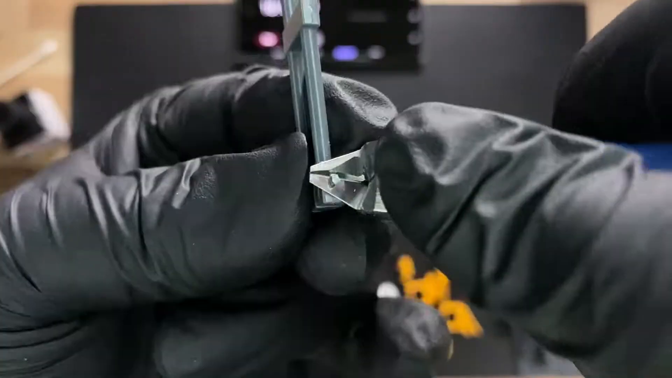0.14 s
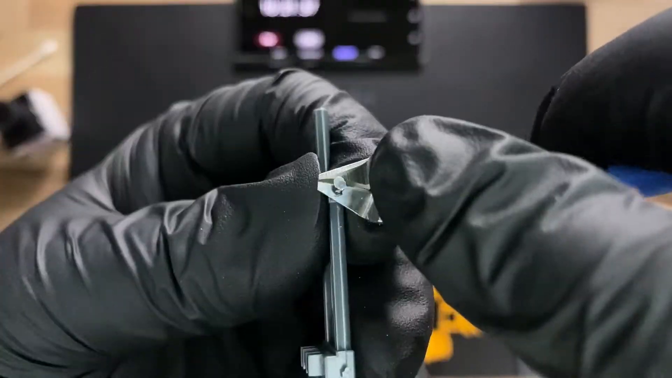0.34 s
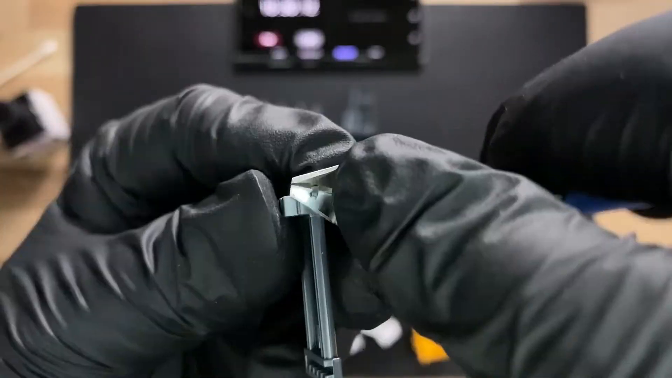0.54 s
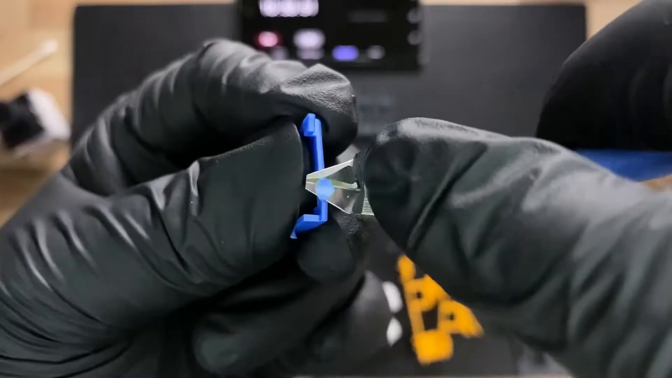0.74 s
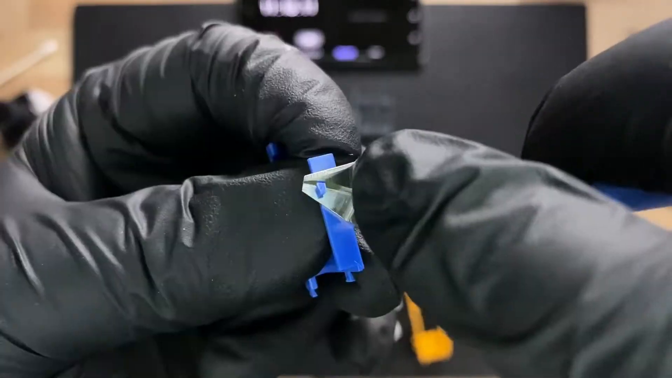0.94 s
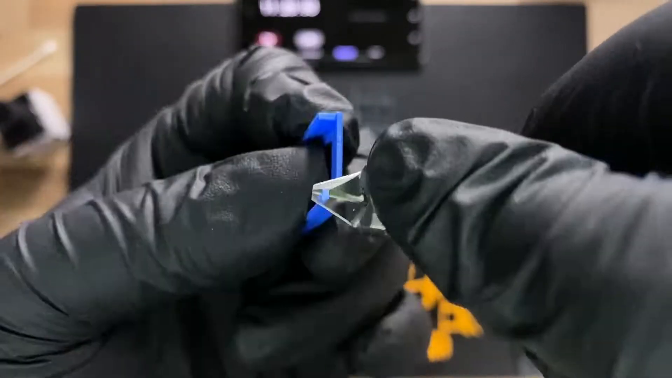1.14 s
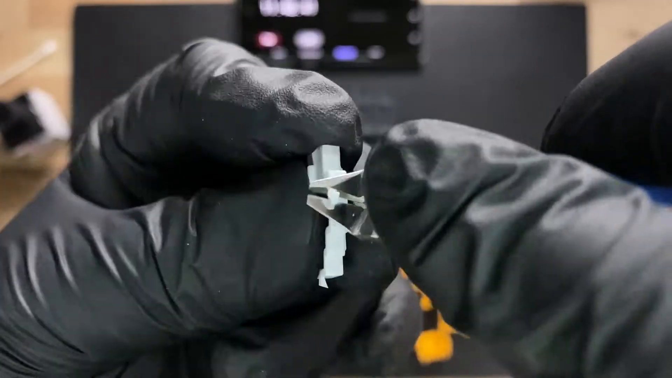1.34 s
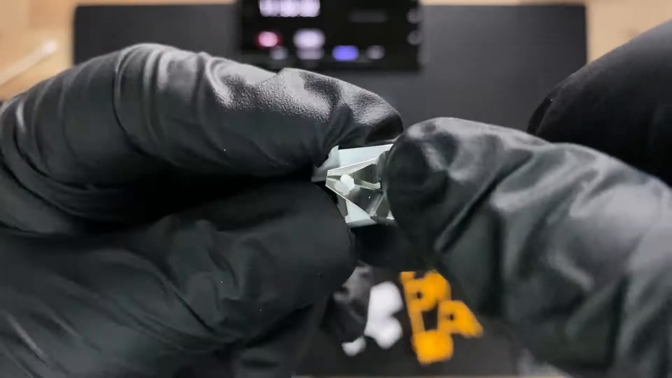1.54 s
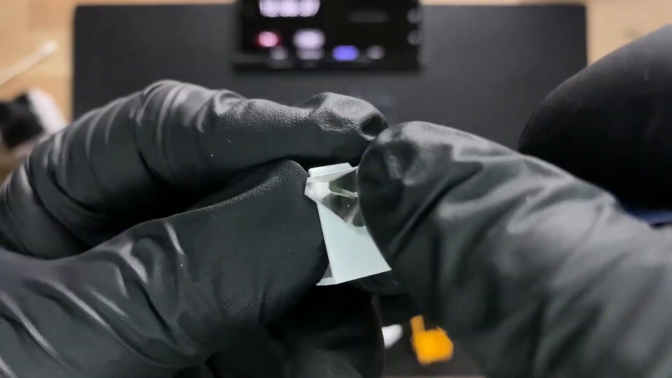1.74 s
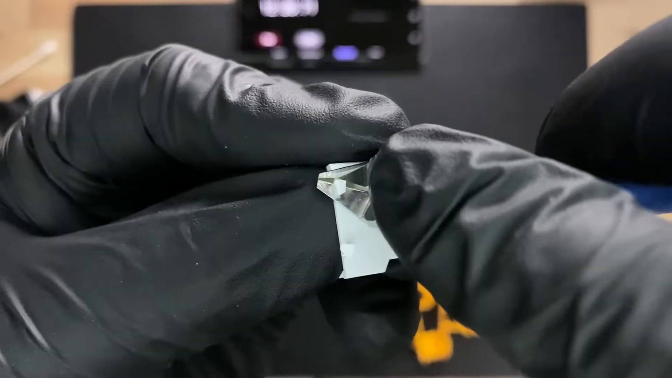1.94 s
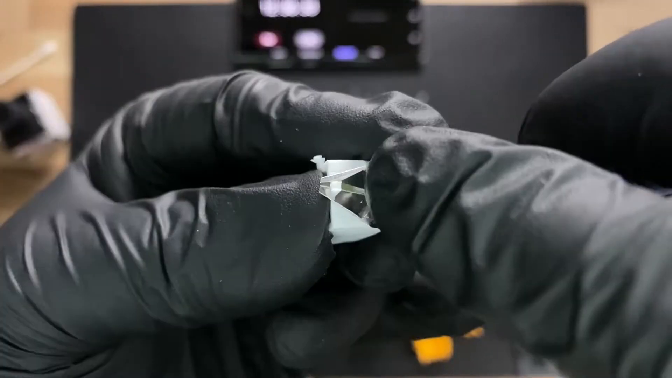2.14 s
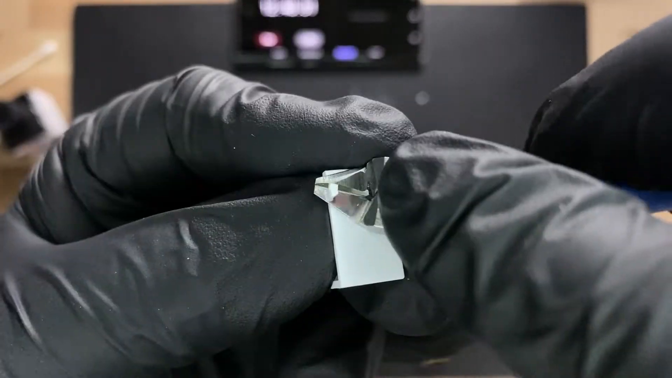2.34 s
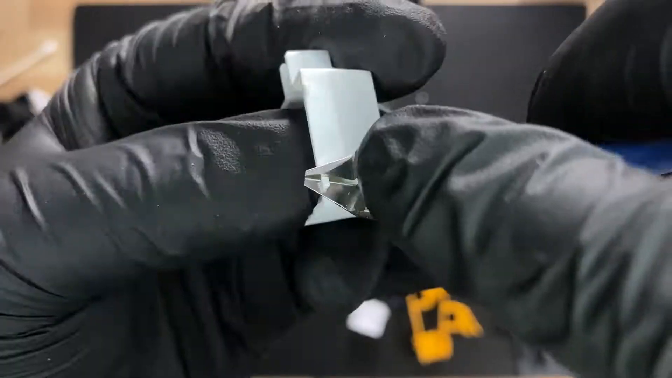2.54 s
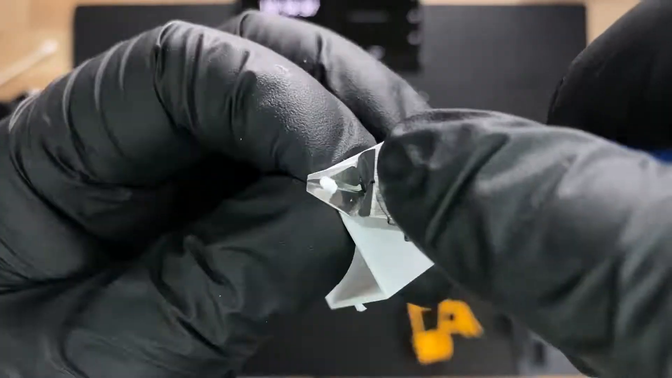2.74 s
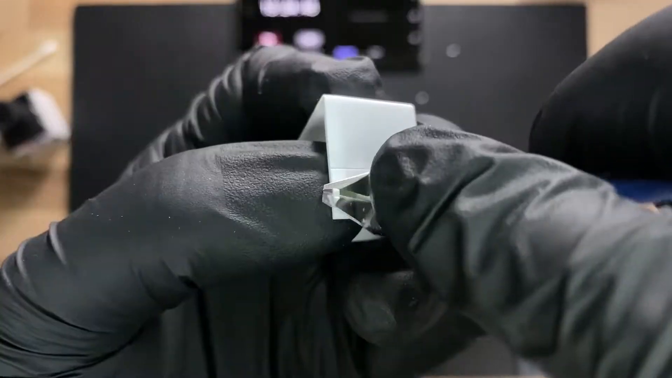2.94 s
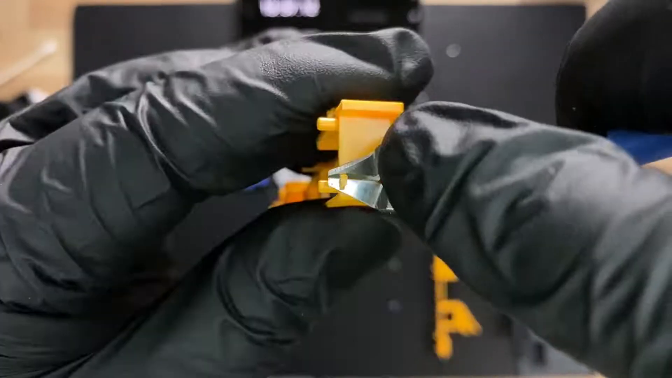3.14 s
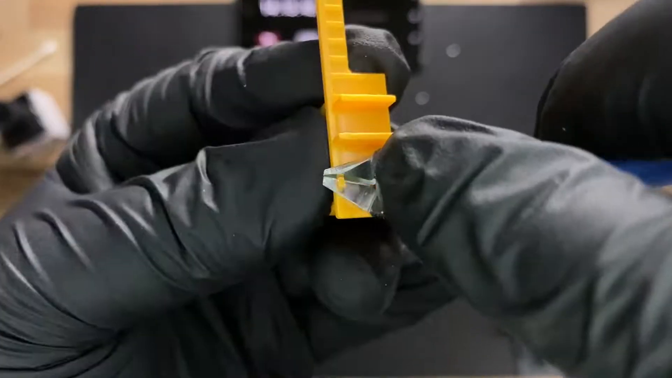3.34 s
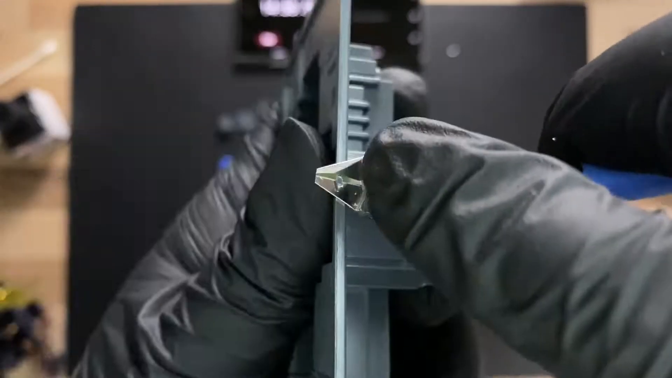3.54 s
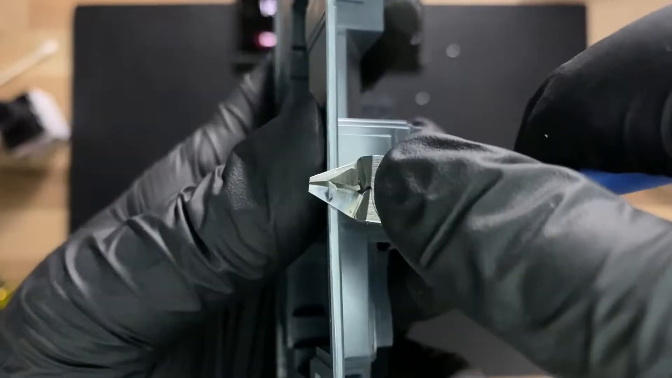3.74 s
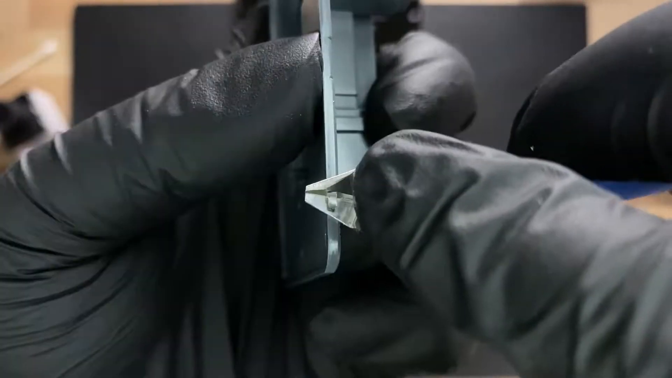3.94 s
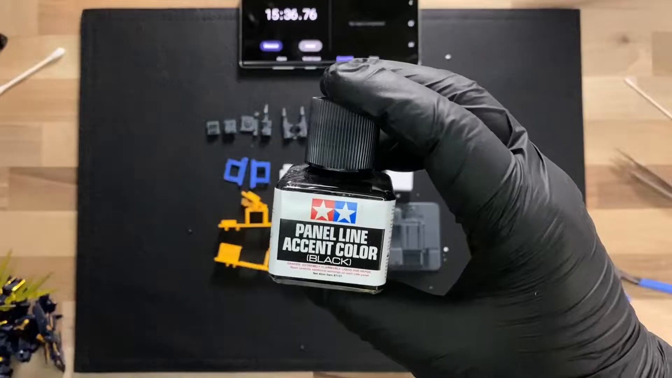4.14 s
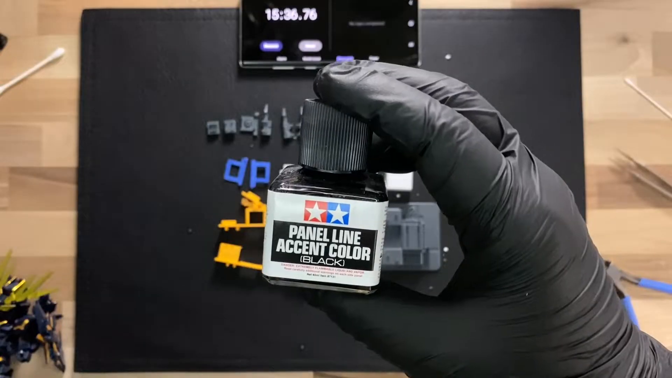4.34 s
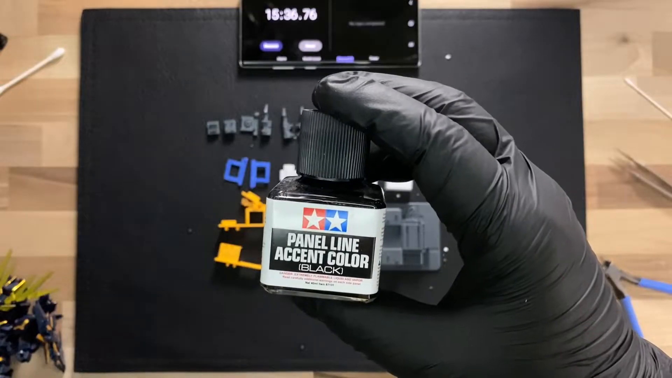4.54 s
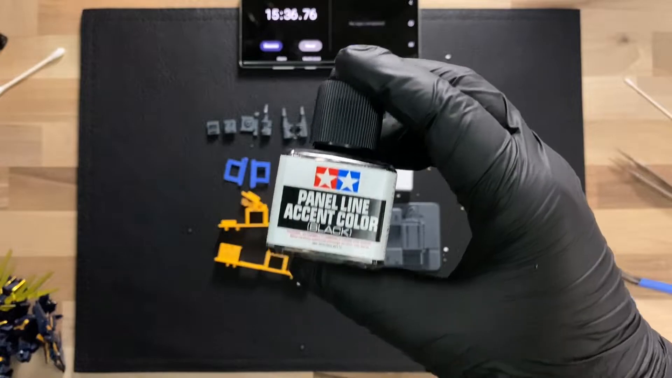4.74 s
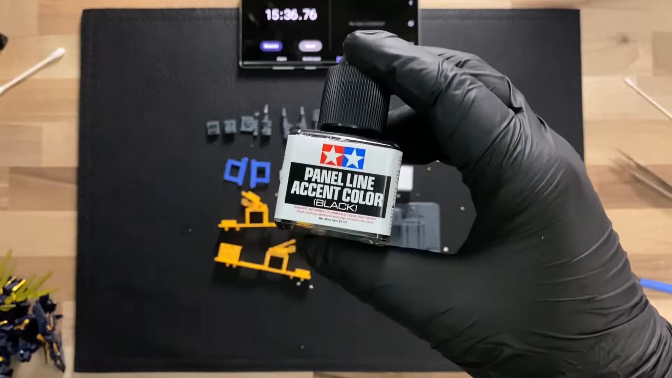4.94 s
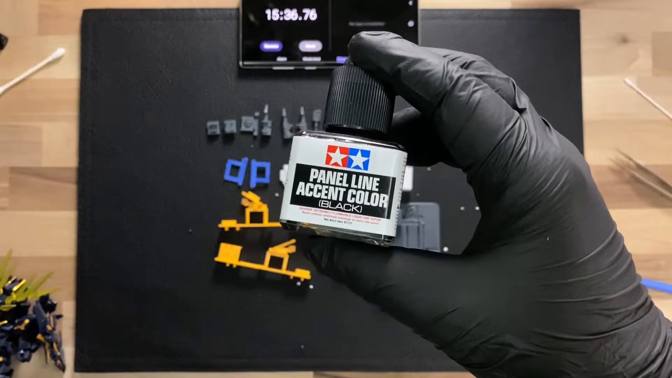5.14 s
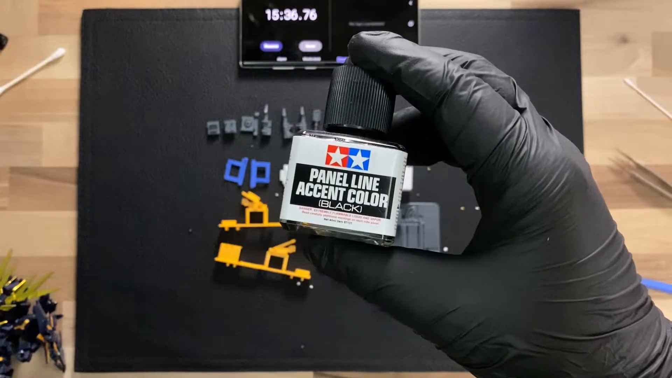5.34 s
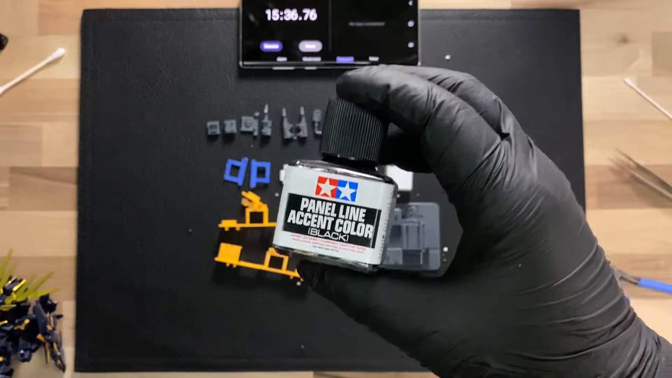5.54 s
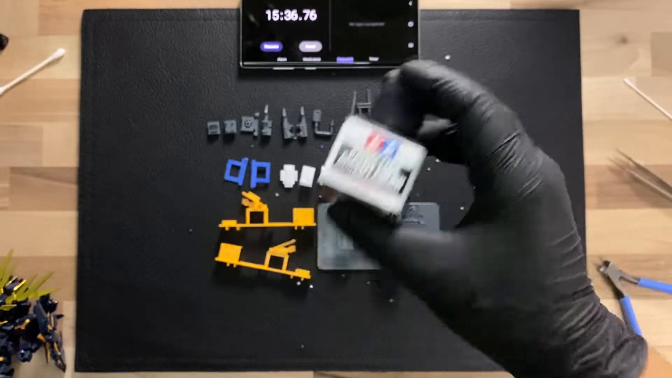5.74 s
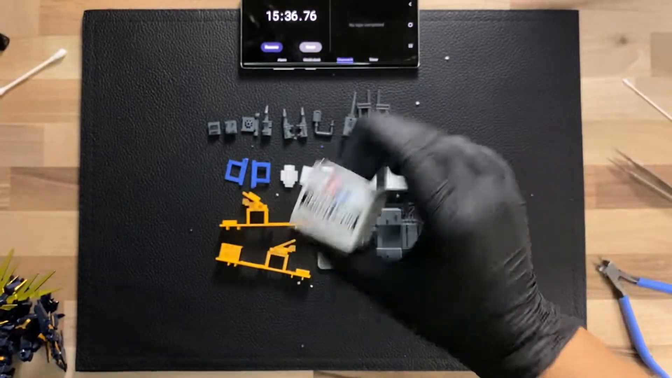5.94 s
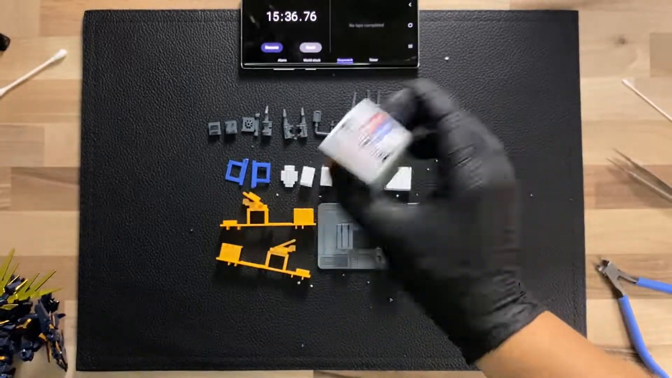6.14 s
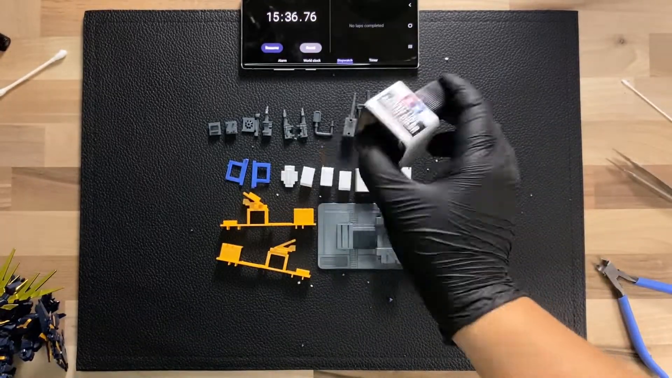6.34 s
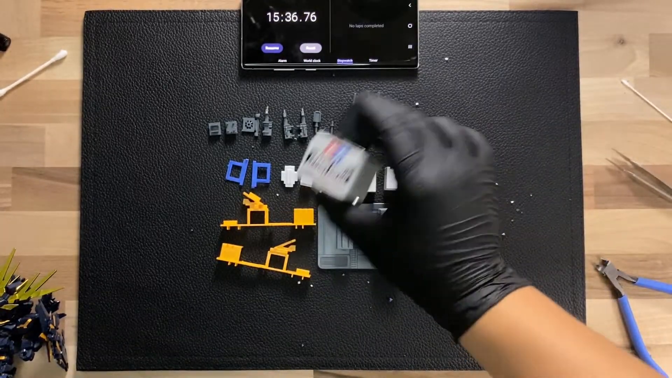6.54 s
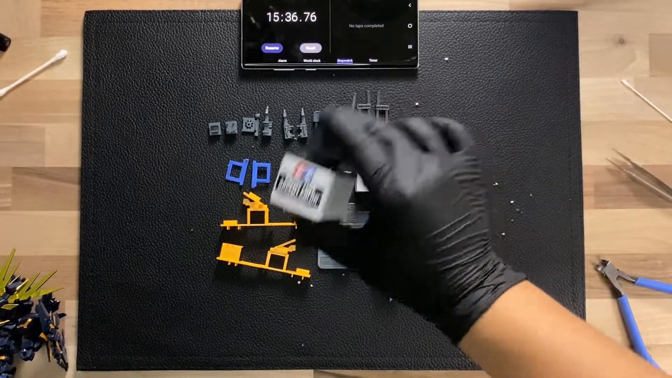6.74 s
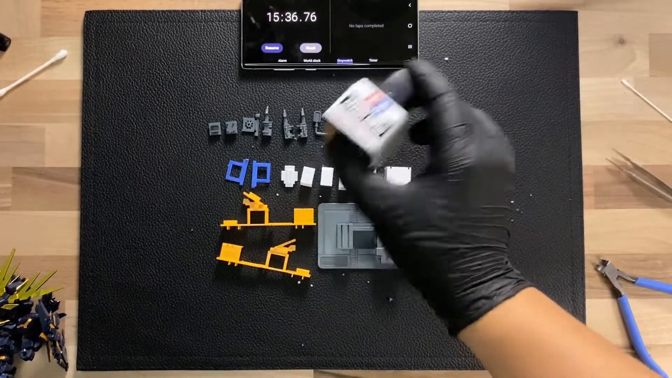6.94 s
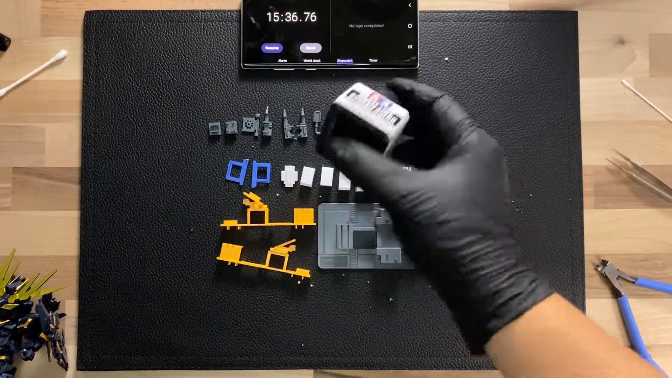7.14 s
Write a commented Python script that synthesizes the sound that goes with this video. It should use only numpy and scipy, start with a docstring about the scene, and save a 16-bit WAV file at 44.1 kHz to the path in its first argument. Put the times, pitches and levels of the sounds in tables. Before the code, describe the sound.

Small cutters snap plastic model parts in a fast, even run of bright clicks, then a little bottle is faintly shaken with soft sloshing.

```python
"""Rapid snips come first: small cutters crack plastic model parts at a desk, about one snip to each tenth-second piece
of a tight edit, every ring chopped at the next splice. Impulses and noise excite damped modes of part and jaws.
Then a small paint bottle is tilted and shaken in gloved hands: filtered noise rubs and washes, an amplitude-modulated
resonance creaks, and rising damped sines give the bubbles of the sloshing liquid.
Beneath lie the shaped noise of a quiet room, with rumble and a low drone, and microphone hiss."""
import sys
import numpy as np
from scipy import signal
from scipy.fft import rfft, irfft
from scipy.io import wavfile
from scipy.ndimage import uniform_filter1d

SR = 44100
rng = np.random.default_rng(int(sys.argv[2]) if len(sys.argv) > 2 else 0)


def pcm_store(signal):
    """Save signal as 16-bit PCM."""
    levels = np.round(np.clip(np.atleast_2d(signal), -1, 1) * 32767)
    wavfile.write(sys.argv[1], SR, levels.astype(np.int16).T)


N = 321930

# Levels in mode and spectrum tables are relative; the sum or noise they shape is scaled later.
# Room rumble: [t/s, level/dB]; its noise spectrum: [f/Hz, level/dB]
RUMBLE_LEVEL = [(0.0, -49.5), (0.36, -50), (0.93, -47.5), (1.81, -49), (2.46, -44.5), (3.19, -48.5),
                (3.8, -47.5), (7.3, -47.5)]
RUMBLE_SPECTRUM = [(8.8, -43.5), (15, 3.5), (123, -4.5), (160, -8), (236, -11), (275, -15.5), (334, -16),
                   (561, -23.5), (681, -23), (1500, -41), (1950, -84.5), (3300, -120)]
# Low drone: [t/s, level/dB]; its noise spectrum: [f/Hz, level/dB]
DRONE_LEVEL = [(0.0, -65), (0.4, -68.5), (0.8, -64), (2.42, -57), (3.4, -66.5), (3.73, -60), (4.2, -67.5)]
DRONE_SPECTRUM = [(180, -38.5), (250, -2.5), (310, -1.5), (400, -39.5)]
# Microphone hiss spectrum: [f/Hz, level/dB]
HISS_SPECTRUM = [(590, -15.5), (1000, 1), (1110, -8), (1250, -1), (2870, -8.5), (15000, -14.5),
                 (16500, -24.5)]
# Dull wash after the last splice, spectrum: [f/Hz, level/dB]
AFTERWASH_SPECTRUM = [(500, -28), (1000, -2), (1340, 5), (1550, -2), (2050, 1), (2300, -12), (3000, -21)]

# Desk and the things on it, echoes: [delay t/s, level/dB]; their colour: [f/Hz, level/dB]
DESK_ECHOES = [(.0045, -10), (.0082, -17.5), (.014, -30)]
ECHO_SPECTRUM = [(300, 6.5), (6000, -4), (11000, -2.5), (16000, -10)]
# Diffuse room tail: [f/Hz, 60 dB decay t/s]; its colour: [f/Hz, level/dB]
TAIL_DECAY = [(500, 0.1), (2000, 0.17), (6000, 0.32), (14000, 0.11)]
TAIL_SPECTRUM = [(500, -3), (2000, -1.5), (6000, -7), (9000, -8.5), (15000, -9)]

# Liquid wash spectrum: [f/Hz, level/dB]
WASH_SPECTRUM = [(400, 0), (750, 4), (1200, 6.5), (1540, 1), (1660, 7), (1800, 4.5), (2700, -4), (2930, -2),
                 (3200, -8), (6000, -30)]
# Liquid slaps the glass: [t/s, level/dB, bubble f/Hz, splash level above the slap level/dB]
LIQUID_SLAPS = [(5.918, -56, 1680, -13), (5.949, -56, 1620, -4), (5.977, -44.5, 1680, 0),
                (5.984, -49, 600, -15), (6.039, -45.5, 885, -14), (6.061, -45.5, 1460, 1),
                (6.085, -51, 1654, 1), (6.132, -48, 960, -11), (6.153, -43, 890, -6),
                (6.211, -51, 1150, -6), (6.224, -50, 1050, -4), (6.306, -45, 756, -18),
                (6.32, -42.5, 752, -3), (6.355, -53, 875, -12), (6.392, -45.5, 1130, -10),
                (6.401, -49, 1310, -9), (6.47, -46, 590, -4), (6.525, -45, 1016, -8), (6.594, -56, 616, -7),
                (6.621, -53, 795, -10), (6.65, -50, 1280, 0), (6.754, -58, 759, 2), (6.771, -45, 950, 3),
                (6.925, -46, 970, -1.5), (6.939, -47, 985, -10), (6.971, -58, 690, -10),
                (7.09, -55, 860, -17), (7.111, -49.5, 996, -15)]
# Splash noise spectrum: [f/Hz, level/dB]
SPLASH_SPECTRUM = [(1200, -22), (2800, 10.0), (4000, -1), (8000, -15), (15000, -26)]
# Air and wall modes of the bottle: [f/Hz, level/dB, 60 dB decay t/s]
BOTTLE_MODES = [(1690, -11, 0.037), (2944, -1.5, 0.049), (940, -16, 0.014)]
# Turns of the bottle at the stroke ends: [t/s, wash level/dB, glove hiss level/dB, glove creak level/dB]
BOTTLE_TURNS = [(5.86, -64, -57, -63), (5.98, -55, -63, -59.5), (6.062, -54, -66, -68),
                (6.155, -51, -56, -58), (6.326, -46, -63.5, -60), (6.47, -51, -54, -60),
                (6.528, -51, -64, -70), (6.63, -49.5, -63, -56), (6.778, -49, -66, -66),
                (6.936, -51, -62, -57.5), (7.125, -61, -62, -68)]
# Vigour of the shaking, heard between the turns: [t/s, level/dB]
SHAKE_VIGOUR = [(5.74, -80), (5.8, -66.5), (6.0, -60.5), (6.35, -61.5), (6.7, -63), (6.95, -60.5),
                (7.05, -65), (7.3, -65)]

# Glove rub spectrum: [f/Hz, level/dB]
RUB_SPECTRUM = [(1470, -24), (2500, -3), (3720, 2.5), (5830, -0.5), (7300, 1), (13700, -8.5), (16000, -7.5)]
# Fingers shift on the bottle: [loudest t/s, hiss level/dB, creak level/dB, 10 dB rise t/s, 10 dB fall t/s]
FINGER_SHIFTS = [(4.79, -65.5, -95, .12, .06), (5.43, -71, -74.5, .04, 0.2), (5.515, -70, -64, .015, .045),
                 (5.585, -61, -60.5, 0.057, 0.13), (5.768, -67, -61, 0.021, .015)]
# Centre of the drifting creak resonance: [t/s, f/Hz]
CREAK_CENTRE = [(5.4, 3750), (5.7, 3600), (5.8, 3350), (5.96, 3313), (6.1, 3050), (6.6, 3050), (7.0, 3300)]
# Creak spectrum on either side of its centre: [offset f/Hz, level/dB]
CREAK_SPECTRUM = [(10, -3.5), (250, -5.5), (600, -11), (1500, -18), (8000, -36)]

# Light touches of jaws and glove: [t/s, peak level/dB, f/Hz]
LIGHT_TOUCHES = [(.406, -45, 6900), (0.4344, -54, 8300), (.465, -60, 3500), (1.2965, -56, 3480),
                 (2.069, -53, 3570), (2.1583, -57, 2520), (2.657, -55, 3520), (5.417, -61, 8500),
                 (5.4355, -58, 8550), (5.768, -50, 3390), (5.8595, -42, 7000), (6.0212, -49, 3900),
                 (6.126, -52, 5800), (6.155, -40.5, 3500), (6.329, -41.5, 3000), (6.377, -48, 3900),
                 (6.651, -46, 2600), (7.122, -51, 4280)]
# Snips: [t/s, peak level/dB, then relative level/dB of low mode, high mode, part rattle, jaw ring, crack]
SNIP_EVENTS = [(0.0106, -23, -17, -44, -14, -6.5, -0.5), (0.104, -21.5, -14, -25, -8.5, -6, -0.5),
               (0.2054, -26, -16, -35, -12, -8.5, -7), (0.3081, -28, -16, -37, -14, -11.5, -5.5),
               (0.5137, -27, -36, -44, -22, -18.5, -10.5), (0.6107, -18, -16.5, -42, -15.5, -4, 3),
               (0.7016, -28.5, -18, -27, -11.5, -9, -3), (0.7982, -16.5, -11, -40, -18.5, -13, -4),
               (0.9072, -25, -15, -37, -12.5, -8.5, -3), (1.0023, -25.5, -21, -28, -11.5, -7.5, -0.5),
               (1.0966, -21.5, -22, -26, -12, -8.5, -4), (1.2, -25, -15.5, -23, -15, -11, -6),
               (1.3243, -22, -16.5, -34, -21, -12, -6), (1.4057, -22, -8.5, -29, -10, -4, 1),
               (1.5033, -23, -17.5, -37, -12.5, -13.5, -7), (1.6092, -24.5, -22, -20, -21.5, -19, -9.5),
               (1.71, -21, -24, -18, -16.5, -15, -6), (1.8105, -25.5, -24, -22, -24, -22, -11.5),
               (1.902, -28, -30, -16, -9, -17, -6.5), (2.0017, -19.5, -19, -17, -12.5, -10, -3),
               (2.1044, -25.5, -20.5, -23, -18, -14.5, -7.5), (2.2083, -22, -18, -19, -14.5, -10, -1.5),
               (2.302, -23, -16, -23, -12, -10.5, -4), (2.3995, -24.5, -7.5, -17, -11.5, -9, -5),
               (2.5033, -18, -27, -3.5, -15, -18.5, -8.5), (2.602, -21.5, -21, -11, -13, -18.5, -4),
               (2.7093, -22, -31, -4, -9.5, -14, -3.5), (2.8057, -27.5, -14.5, -16.5, -11.5, -10.5, -8),
               (2.9093, -20.5, -12, -10.5, -12, -11.5, -7), (3.015, -26, -19, -35, -17.5, -18, -8),
               (3.1026, -26.5, -17, -26, -14, -15.5, -7.5), (3.2, -34, -25, -15, -16, -23, -24),
               (3.3037, -20, -24, -14, -17.5, -16.5, -8), (3.4074, -22, -15, -22, -15, -10.5, -5.5),
               (3.467, -32.5, -5, -14, -4, -26, -7), (3.5036, -15.5, -7.5, -10.5, -5, -33, -9),
               (3.6122, -18, -18, -11.5, -10.5, -27, -17), (3.703, -16, -7.5, -9, -9.5, -15.5, -6),
               (3.814, -17.5, -5.5, -12.5, -6, -9.5, -5.5), (3.909, -17, -27, 3.5, 2, -26, -23),
               (3.912, -19.5, -4.5, -16, -10, -17.5, -24)]
# Parts in hand, the last and largest in five grips: [held from t/s, low mode f/Hz, its 60 dB decay t/s,
# high mode f/Hz, its decay t/s, deep mode f/Hz, its decay t/s, its level/dB,
# rattle tilt/(dB per octave), squeeze level/dB, thud level/dB]
HELD_PARTS = [(0, 2280, .022, 4800, .028, 1600, .0145, -29, -6, -56.5, -24),
              (.65, 2150, .02, 5050, .027, 1700, .0145, -34, 0.5, -53, -25),
              (1.15, 2240, .024, 5000, .03, 1700, .0145, -40, 1, -50, -26),
              (1.76, 2260, .017, 3800, .022, 1350, .0145, -33, -4, -50, -22.5),
              (2.45, 2270, .016, 3650, .016, 1720, .0145, -38, 1, -47, -27.5),
              (2.96, 2310, .013, 5100, .017, 1790, .0145, -31, -3.5, -44.5, -25),
              (3.435, 2330, .012, 4940, .012, 1320, .025, -8.5, -5.5, -39, -40),
              (3.56, 3920, .025, 4930, .025, 1350, .035, -10, -1.5, -40.5, -32),
              (3.66, 2370, .012, 4550, .011, 1770, .0145, -20, -2.5, -36.5, -28),
              (3.76, 2480, .027, 3480, .03, 1720, .0145, -14, -8, -39, -25),
              (3.86, 2490, .035, 3400, .008, 2045, .03, -14, -2, -39, -34)]
# Modes of the cutter jaws: [f/Hz, level/dB, 60 dB decay t/s]
JAW_MODES = [(5490, -13.5, 0.08), (5730, 0, 0.035), (6010, 2, 0.0093), (2150, -15, 0.016),
             (10600, -17, 0.03), (12200, -29, 0.03)]
# Hollow body mode of the large part: (f/Hz, level/dB, 60 dB decay t/s)
LARGE_BODY_MODE = (760, -19, .016)
# Spectra of the crack and the part rattle: [f/Hz, level/dB]
CRACK_SPECTRUM = [(300, -64.5), (1500, -32), (4000, -8), (7000, 2), (9700, -4), (11200, 4), (13000, -1.5),
                  (16500, -5)]
RATTLE_SPECTRUM = [(400, -0.5), (1000, -17), (1600, 7.5), (2500, 4), (3500, 6.5), (5000, 5), (7500, 1),
                   (12000, -4)]
# Radiation of small parts, weak in the bass: [f/Hz, level/dB]
RADIATION = [(200, -40.5), (450, -21.5), (750, -8), (1000, -5), (1400, -5), (2000, -1.5), (16000, 1.5)]

SPAN, LEAD = 8192, 2048  # samples in a response; samples of a snip ahead of its crack
SPLICE_S, PIECE_S, PIECES = .0494, .1, 40  # first splice, piece length, number of pieces
HISS_DB, TOP_HZ = -68.5, 15750
AFTERWASH_S, AFTERWASH_DB, AFTERWASH_SAG_DB = (3.95, 4.13), -64, -3
AFTERWASH_FADE_S = .015  # for 10 dB
# rise and fall about each turn, for 10 dB
WASH_RISE_FALL_S, HISS_RISE_FALL_S, CREAK_RISE_FALL_S = (.025, .03), (.012, 0.016), (0.018, 0.026)
SHAKE_HISS_DB, SHAKE_CREAK_DB = -5, -7  # relative to the shaking vigour, between turns
SNIP_ROOM_DB, TICK_ROOM_DB = -4.2, -3.0  # diffuse tail
SECOND_BREAK_S = .01  # a crack this soon after another needs no new squeeze
LARGE_FROM_S = 3.435  # the large part is in hand after this


def undb(db):
    """Level to amplitude: 20 dB is a factor of ten."""
    return 10 ** (np.asarray(db) / 20)


def on_hz(table, hz):
    """Interpolation of a (f, value) table along log frequency."""
    table = np.array(table)
    return np.interp(np.log(hz + 1), np.log(table[:, 0]), table[:, 1])


def on_time(s, db):
    """Envelope: gain along a level curve, effectively silent outside it."""
    return undb(np.interp(np.arange(N) / SR, s, db, left=-200, right=-200))


def colour(x, table):
    """Linear filtering: shape the last axis by a level spectrum, then bring it to rms 1."""
    n = x.shape[-1]
    hz = np.arange(n // 2 + 1) * SR / n
    y = irfft(rfft(x) * undb(on_hz(table, hz)), n)
    return y / np.sqrt(np.mean(y ** 2, axis=-1, keepdims=True))


def causal(table):
    """Minimum phase by cepstral folding: the spectrum of a causal filter with the given level."""
    hz = np.arange(SPAN // 2 + 1) * SR / SPAN
    cepstrum = irfft(np.log(undb(on_hz(table, hz))))
    cepstrum[1:SPAN // 2] *= 2
    cepstrum[SPAN // 2 + 1:] = 0
    return np.exp(rfft(cepstrum))


def ring(hz, t60, count=SPAN, glide=0.):
    """Damped oscillation: decaying sines, one row each, of energy 1; a positive glide raises the pitch."""
    t = np.arange(count) / SR
    hz, t60 = np.reshape(hz, (-1, 1)), np.reshape(t60, (-1, 1))
    decay = np.exp(-np.log(1000) * t / t60)
    y = np.sin(2 * np.pi * hz * t * (1 + glide * t / t60)) * decay
    return y / np.sqrt(np.sum(y ** 2, axis=1, keepdims=True))


def flicker(rate, db):
    """Random amplitude modulation: smoothed steps, rate of them a second, of depth set by db."""
    step = int(SR / rate)
    steps = np.repeat(rng.standard_normal(N // step + 1), step)
    return undb(db * uniform_filter1d(steps, step)[:N])


def swells(s, db, rise, fall):
    """Incoherent addition: powers of swells peaking at s add; rise and fall are times for 10 dB."""
    rise, fall = np.reshape(rise, (-1, 1)), np.reshape(fall, (-1, 1))
    since = np.arange(N) / SR - np.reshape(s, (-1, 1))
    drop = np.where(since < 0, -since / rise, since / fall)
    gains = undb(np.reshape(db, (-1, 1)) - 10 * np.minimum(drop, 20))
    return np.sqrt(np.sum(gains ** 2, axis=0))


def shaking(column, rise_fall, base_db):
    """Periodic excitation: the gain of one shake sound swells at each turn over the steady vigour."""
    turns = np.array(BOTTLE_TURNS)
    s, db = np.transpose(SHAKE_VIGOUR)
    return np.hypot(swells(turns[:, 0], turns[:, column], *rise_fall), on_time(s, db + base_db))


def peaked(rows):
    """Short-time level: scale each row so that its loudest 1.6 ms have rms 1."""
    power = uniform_filter1d(rows ** 2, size=70, axis=1)
    return rows / np.sqrt(power.max(axis=1, keepdims=True))


def add(out, rows, times, lead=0, ends=None):
    """Superposition: lay each row at its time, cut off at its end."""
    for k, row in enumerate(rows):
        start = int(times[k] * SR) - lead
        end = N if ends is None else int(ends[k] * SR)
        lo, hi = max(start, 0), min(end, start + len(row), N)
        out[lo:hi] += row[lo - start:hi - start]


def desk(count, room_db):
    """Reflection and reverberation: direct sound, smeared desk echoes, a tail decaying by octave bands."""
    t = np.arange(SPAN) / SR
    hz, tail = np.arange(SPAN // 2 + 1) * SR / SPAN, 0
    noise = rfft(rng.standard_normal((count, SPAN)))
    for centre in 500 * 2. ** np.arange(6):
        band = np.clip(1 - abs(np.log2((hz + 1) / centre)), 0, 1)
        decay = np.exp(-np.log(1000) * t / on_hz(TAIL_DECAY, centre))
        tail = tail + undb(on_hz(TAIL_SPECTRUM, centre)) * irfft(noise * band) * decay
    tail *= 1 - np.exp(-t / 0.0012)
    # each echo comes off several edges, so it is a short burst
    spread, bursts = rng.standard_normal((count, len(DESK_ECHOES), 2, 1)), 0
    for k, (lag, db) in enumerate(DESK_ECHOES):
        since = t - lag - 0.00024 * spread[:, k, 0]
        bursts = bursts + (since > 0) * np.exp(-abs(since) / 0.0006) * undb(db + 1.9 * spread[:, k, 1])
    echoes = rfft(0.23 * bursts * rng.standard_normal((count, SPAN))) * causal(ECHO_SPECTRUM)
    return 1 + echoes + rfft(undb(room_db) * tail / np.sqrt(0.017 * SR))


def room():
    """Stationary noise: rumble, low drone and hiss; at each splice the rumble jumps to another moment."""
    rumble = colour(rng.standard_normal(N), RUMBLE_SPECTRUM)
    piece = np.ceil((np.arange(N) / SR - SPLICE_S) / PIECE_S)
    piece = np.clip(piece, 0, PIECES).astype(int)
    jump = rng.integers(0, N, PIECES + 1)[piece]
    rumble = rumble[(np.arange(N) + jump) % N] * on_time(*np.transpose(RUMBLE_LEVEL))
    drone = on_time(*np.transpose(DRONE_LEVEL)) * colour(rng.standard_normal(N), DRONE_SPECTRUM)
    hiss = undb(HISS_DB) * colour(rng.standard_normal(N), HISS_SPECTRUM)
    return drone + rumble + hiss


def afterwash():
    """Exponential decay: a dull noise wash sags, then dies away, just after the last splice."""
    start, end = AFTERWASH_S
    sag_db = AFTERWASH_SAG_DB * np.array([0, 1, 1])
    level_db = AFTERWASH_DB + sag_db - [0, 0, 20]
    gain = on_time([start, end, end + 2 * AFTERWASH_FADE_S], level_db)
    return gain * colour(rng.standard_normal(N), AFTERWASH_SPECTRUM)


def bottle():
    """Bubble resonance: liquid washes and fizzes; each slap is a splash and a bubble that ring the bottle."""
    wash = colour(rng.standard_normal(N), WASH_SPECTRUM) * flicker(120, 2.5)
    fizz, draw = np.zeros(N), rng.random((400, 3))
    fizz_hz = 600 * 6 ** draw[:, 1]
    bubbles = ring(fizz_hz, 6 / fizz_hz, count=1024, glide=.2) * undb(-14 * draw[:, 2:])
    add(fizz, bubbles, SHAKE_VIGOUR[0][0] + 1.5 * draw[:, 0])
    liquid = shaking(1, WASH_RISE_FALL_S, 0) * (.5 * wash + 12 * fizz)

    s, db, hz, splash_db = np.transpose(LIQUID_SLAPS)
    t = np.arange(2048) / SR
    shape = (1 - np.exp(-t / 0.00055)) * np.exp(-t / 0.0051)
    splash = colour(rng.standard_normal((len(s), 2048)), SPLASH_SPECTRUM)
    splash = shape * undb(splash_db)[:, None] * splash
    bubble = peaked(ring(hz, 18 / hz, count=2048, glide=0.048))
    add(liquid, (splash + bubble) * undb(db)[:, None], s)

    glass_hz, glass_db, glass_t60 = np.transpose(BOTTLE_MODES)
    glass = undb(glass_db) @ ring(glass_hz, glass_t60)
    return liquid + 0.11 * signal.fftconvolve(liquid, glass)[:N]


def glove():
    """Sliding friction: rubber hisses smoothly and creaks in small slips near one drifting resonance."""
    rub = colour(rng.standard_normal(N), RUB_SPECTRUM) * flicker(40, 2.6)
    centre_hz = np.interp(np.arange(N) / SR, *np.transpose(CREAK_CENTRE))
    phase = 2 * np.pi * np.cumsum(centre_hz) / SR
    # two slow noises in quadrature make a noise band about the centre
    band = colour(rng.standard_normal((2, N)), CREAK_SPECTRUM)
    creak = (band[0] * np.cos(phase) + band[1] * np.sin(phase)) * flicker(200, 4.7)
    s, hiss_db, creak_db, rise, fall = np.transpose(FINGER_SHIFTS)
    rub_gain = np.hypot(swells(s, hiss_db, rise, fall), shaking(2, HISS_RISE_FALL_S, SHAKE_HISS_DB))
    creak_gain = np.hypot(swells(s, creak_db, rise, fall), shaking(3, CREAK_RISE_FALL_S, SHAKE_CREAK_DB))
    return rub * rub_gain + creak * creak_gain


def ticks():
    """Impact of light bodies: short damped clicks of two partials with a little room."""
    s, db, hz = np.transpose(LIGHT_TOUCHES)
    click = ring(hz, 0.0018) + 0.35 * ring(np.minimum(1.85 * hz, 14000), 0.00077)
    sound = irfft(rfft(click) * desk(len(s), TICK_ROOM_DB))
    out = np.zeros(N)
    add(out, peaked(sound) * undb(db)[:, None], s)
    return out


def snips():
    """Brittle fracture: jaws squeeze the gate until it cracks and rings part and jaws; the splice cuts the tail."""
    s, db, lo_db, hi_db, rattle_db, jaw_db, crack_db = np.transpose(SNIP_EVENTS)[:, :, None]
    parts = np.array(HELD_PARTS)
    held = parts[np.searchsorted(parts[1:, 0], s[:, 0])].T[:, :, None]
    _, lo_hz, lo_t60, hi_hz, hi_t60, deep_hz, deep_t60, deep_db, tilt_db, squeeze_db, thud_db = held
    t = (np.arange(SPAN) - LEAD) / SR
    after = np.maximum(t, 0)
    noise = rng.standard_normal((len(s), 3, SPAN))

    # excitation: growing squeeze, one clean break, a short tearing after it
    squeeze = noise[:, 0] * (t < 0) * undb(squeeze_db) / (1 + (t / 0.0099) ** 2) ** 1.48
    squeeze *= np.diff(s, axis=0, prepend=-1) > SECOND_BREAK_S
    snap = rfft(1. * (t == 0))
    tearing = noise[:, 1] * 0.21 * (t > 0) * np.exp(-after / 0.00083)
    crack = undb(crack_db) * (snap + rfft(tearing)) * causal(CRACK_SPECTRUM)

    rattle = noise[:, 2] * (t > 0) * .25 * np.exp(-after / 0.0027)
    rattle = rfft(rattle + squeeze) * causal(RATTLE_SPECTRUM) * causal(RADIATION)
    octaves = np.log2((np.arange(SPAN // 2 + 1) * SR / SPAN + 500) / 3000)
    rattle *= undb(rattle_db + tilt_db * octaves)

    # modes of jaws and part
    jaw_hz, jaw_gain_db, jaw_t60 = np.transpose(JAW_MODES)
    jaws = undb(jaw_db) * (undb(jaw_gain_db) @ ring(jaw_hz, jaw_t60))
    low = undb(lo_db) * (.8 * ring(lo_hz, lo_t60) + .5 * ring(1.05 * lo_hz, 0.5 * lo_t60))
    low = low + undb(deep_db) * ring(deep_hz, deep_t60)
    high = undb(hi_db) * (ring(hi_hz, hi_t60) + 0.26 * ring(1.024 * hi_hz, .85 * hi_t60))
    thud = undb(thud_db) * (ring(535, 0.021) + 0.6 * ring(348, 0.016))
    body_hz, body_db, body_t60 = LARGE_BODY_MODE
    thud += (s > LARGE_FROM_S) * undb(body_db) * ring(body_hz, body_t60)

    # the squeeze sings in the stiff, high modes only
    ringing = snap * rfft(low) + (snap + rfft(squeeze)) * rfft(high + jaws)
    source = ringing * causal(RADIATION) + snap * rfft(thud) + crack + rattle
    sound = irfft(source * desk(len(s), SNIP_ROOM_DB))
    out, times = np.zeros(N), s[:, 0]
    next_splice = SPLICE_S + PIECE_S * np.ceil((times - SPLICE_S) / PIECE_S)
    add(out, peaked(sound) * undb(db), times, lead=LEAD, ends=next_splice)
    return out


def scene():
    """Superposition of all sources at one microphone."""
    return (room() + afterwash() + bottle() + glove() + ticks() + snips())[None]


def record(dry):
    """Band limitation: a steep elliptic low-pass cuts the top."""
    return signal.sosfilt(signal.ellip(7, .2, 70, TOP_HZ, fs=SR, output="sos"), dry)


dry = scene()
out = record(dry)
pcm_store(out)
```